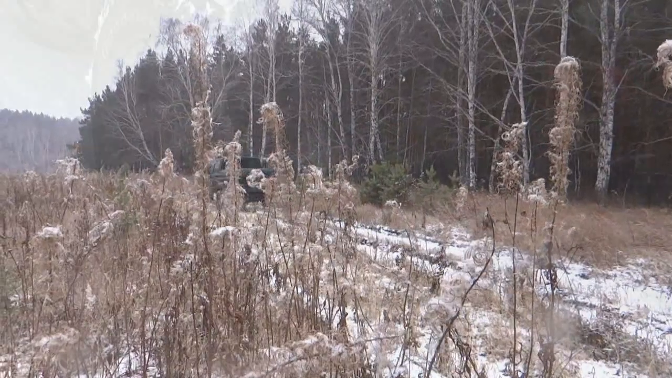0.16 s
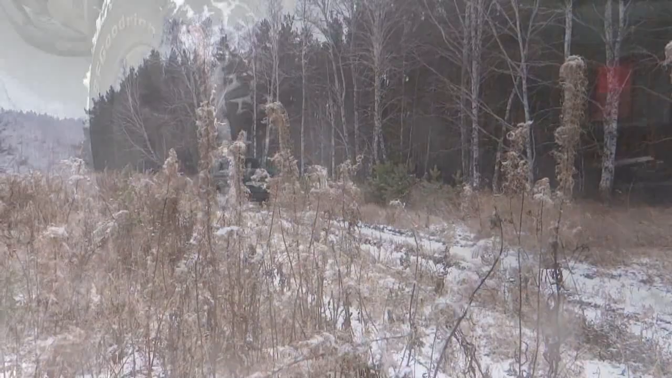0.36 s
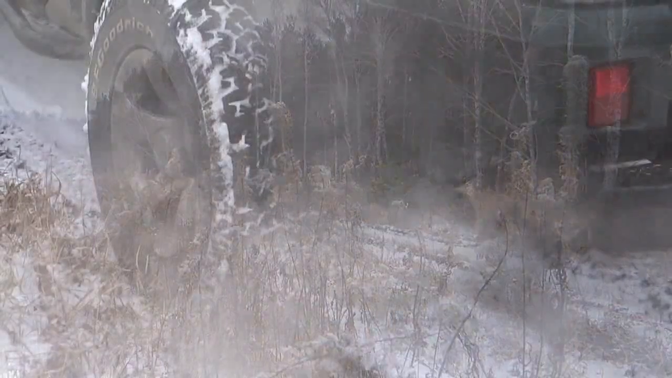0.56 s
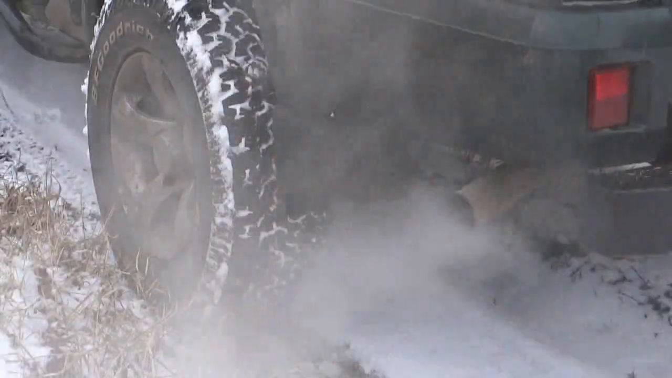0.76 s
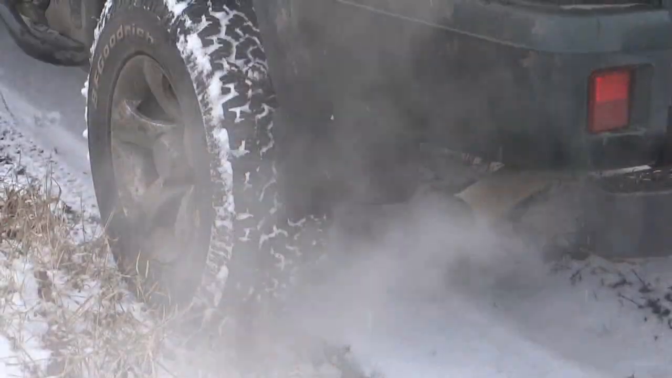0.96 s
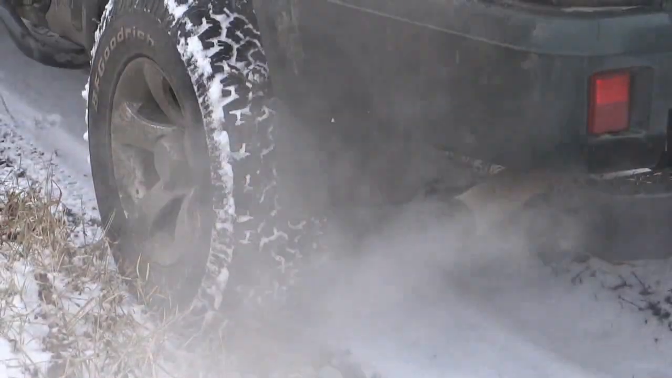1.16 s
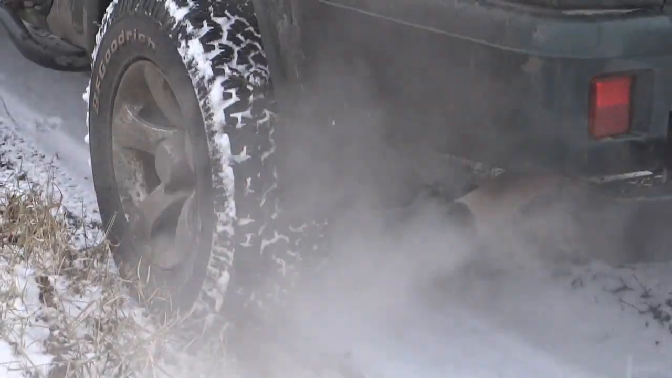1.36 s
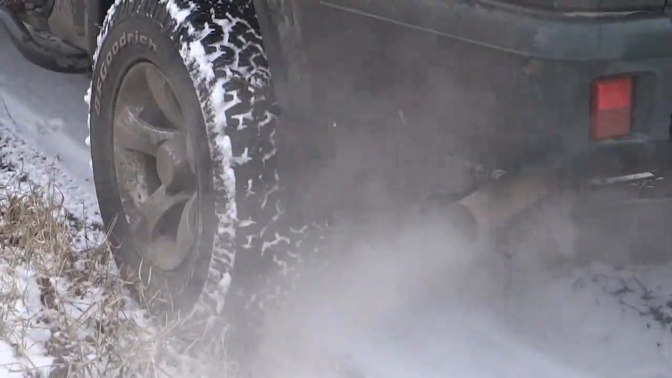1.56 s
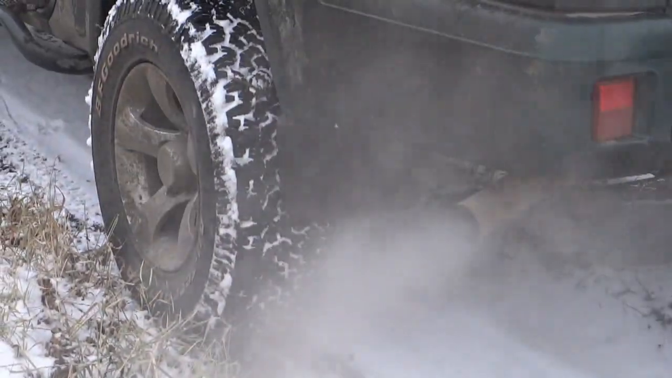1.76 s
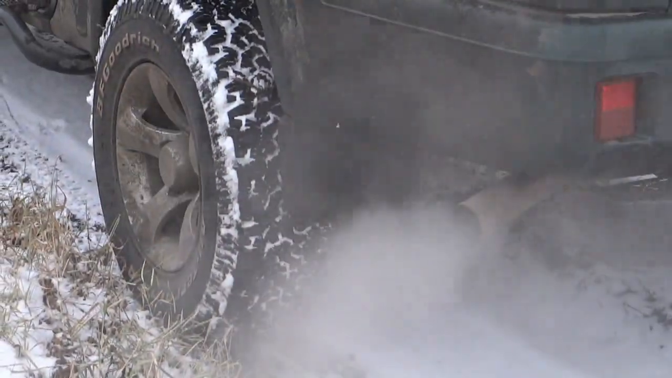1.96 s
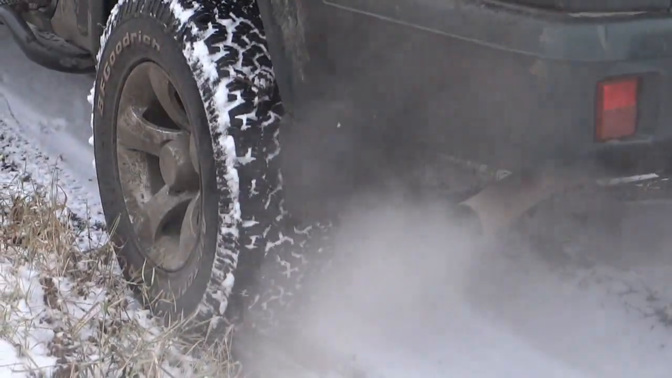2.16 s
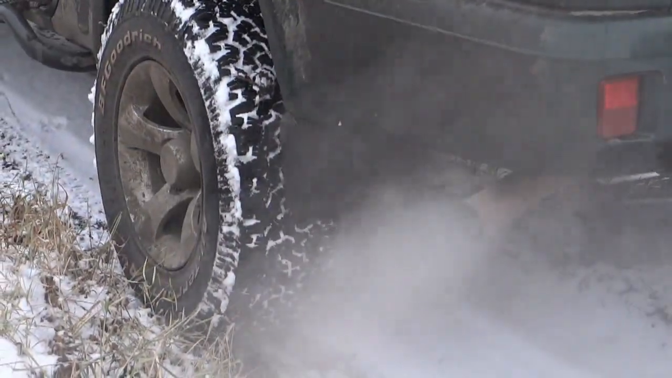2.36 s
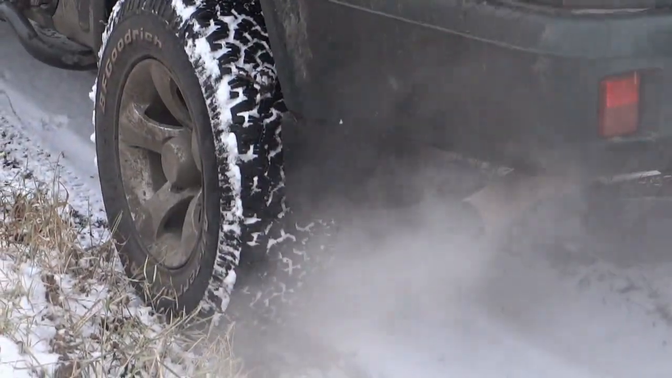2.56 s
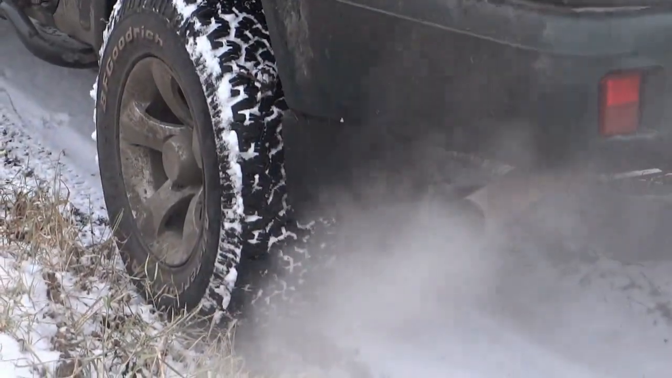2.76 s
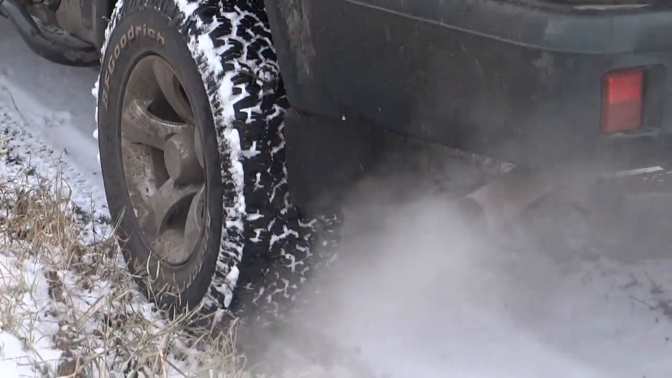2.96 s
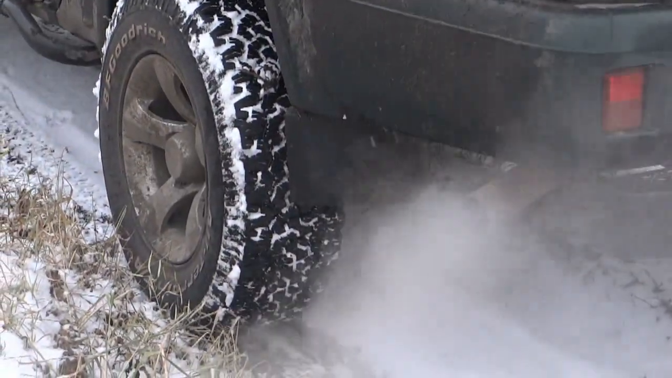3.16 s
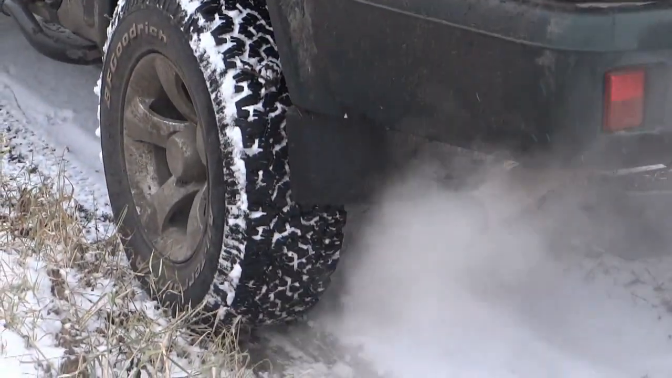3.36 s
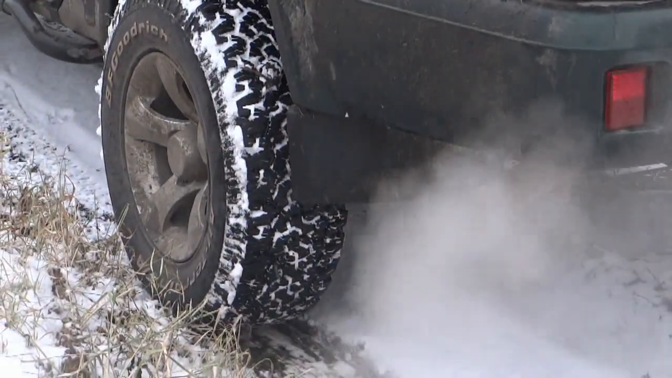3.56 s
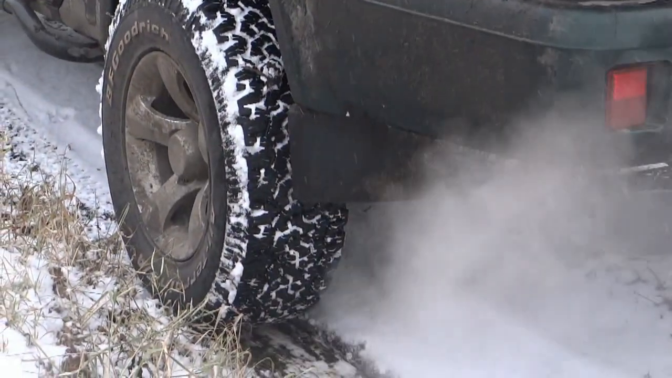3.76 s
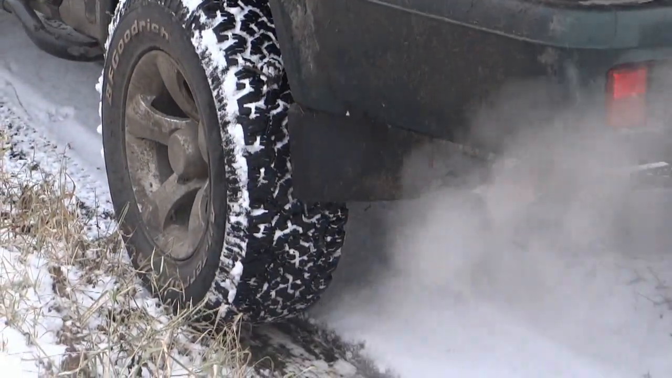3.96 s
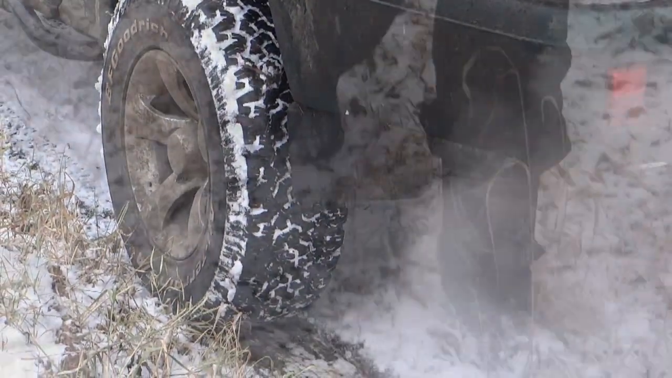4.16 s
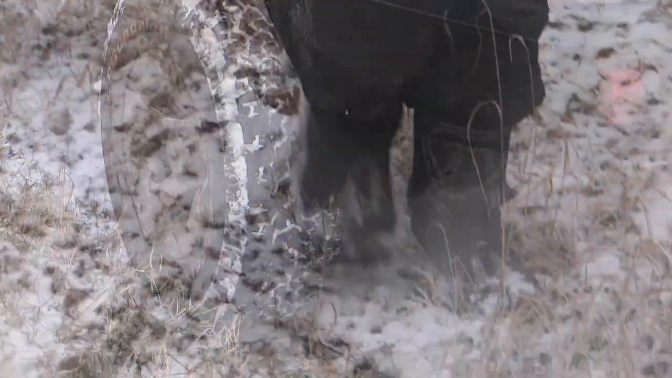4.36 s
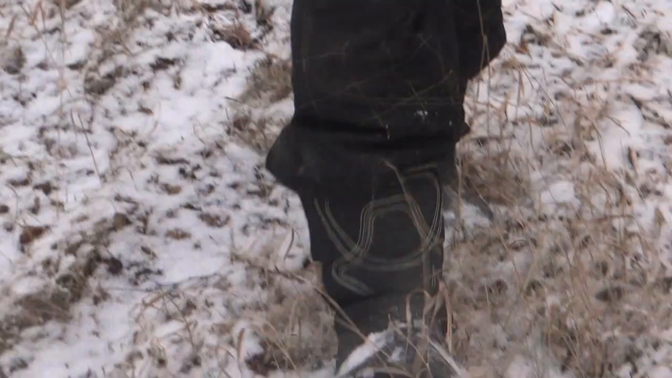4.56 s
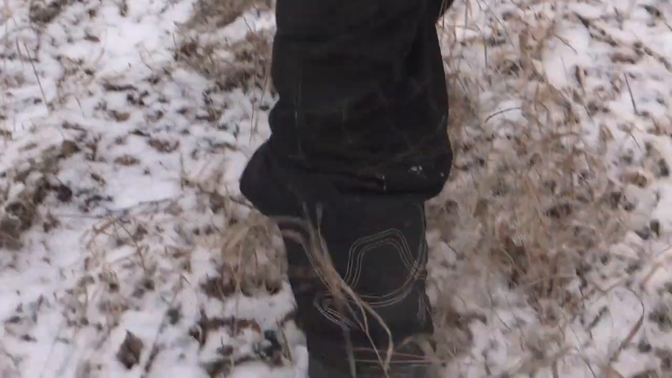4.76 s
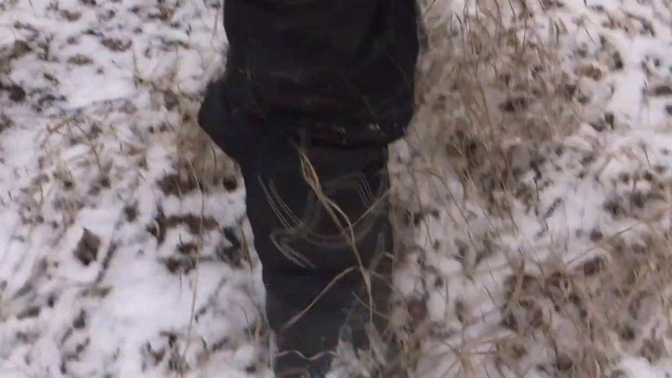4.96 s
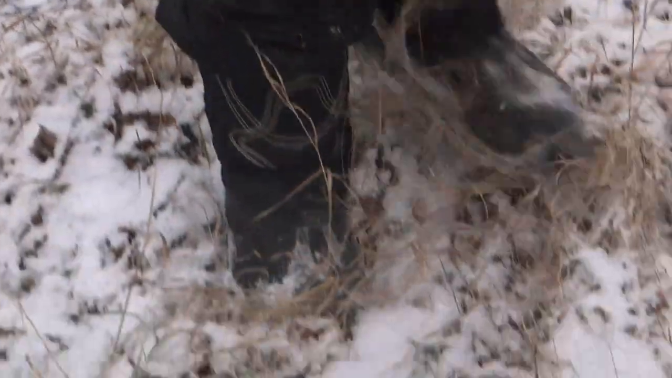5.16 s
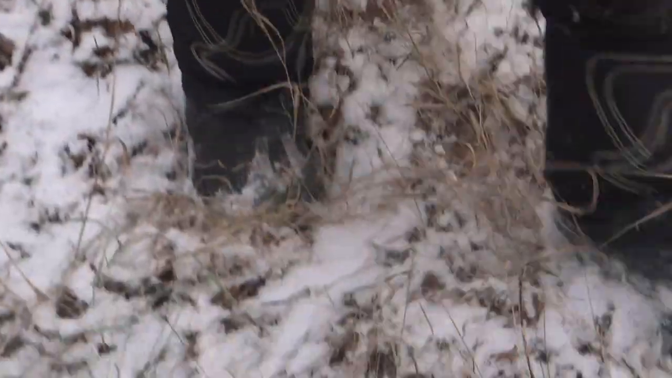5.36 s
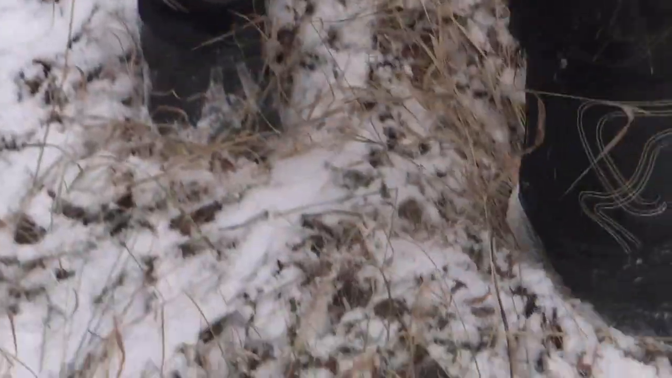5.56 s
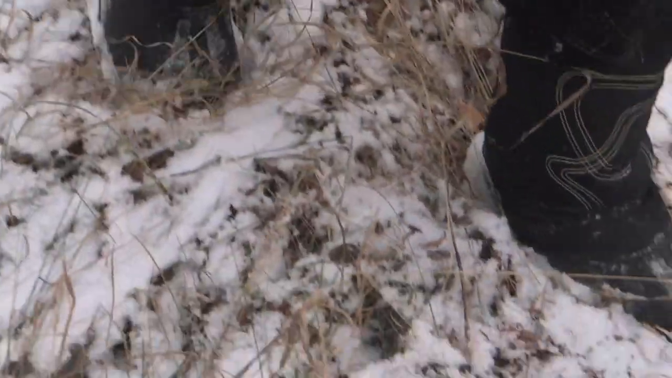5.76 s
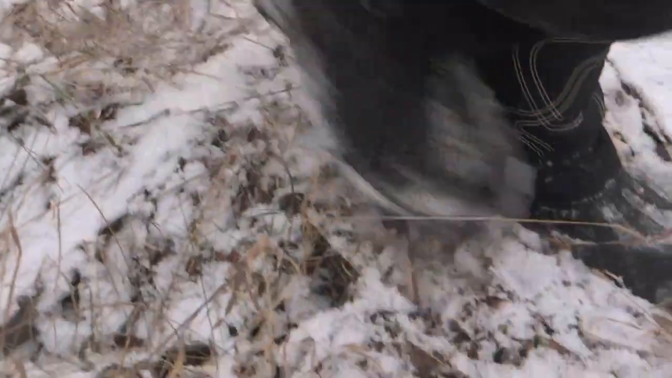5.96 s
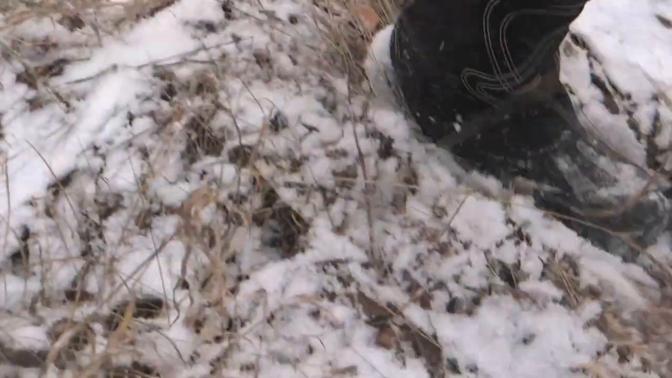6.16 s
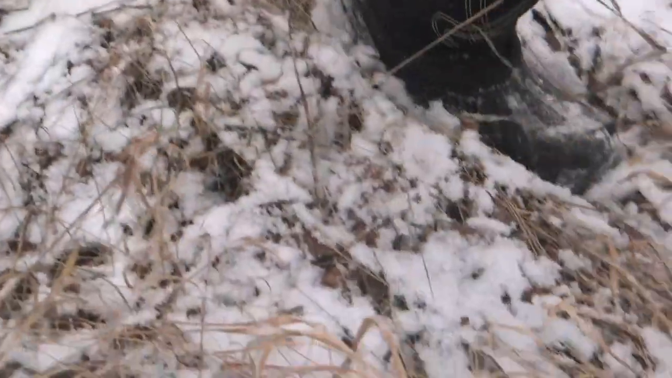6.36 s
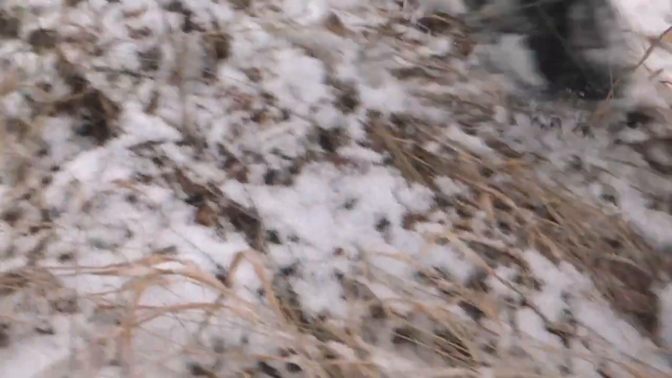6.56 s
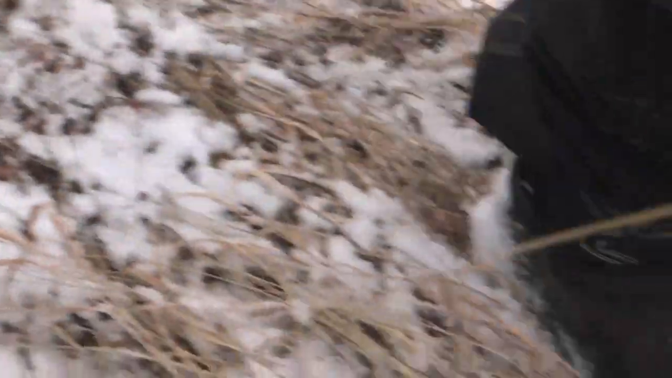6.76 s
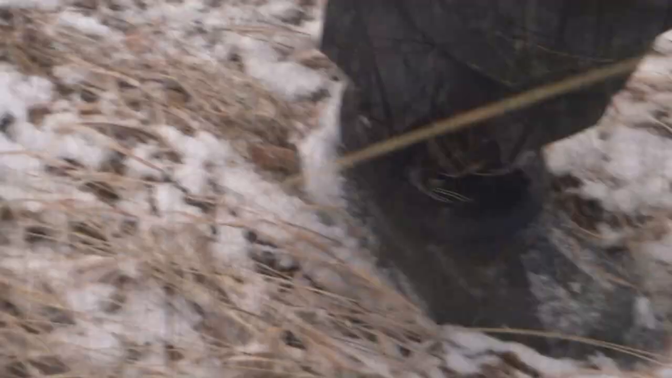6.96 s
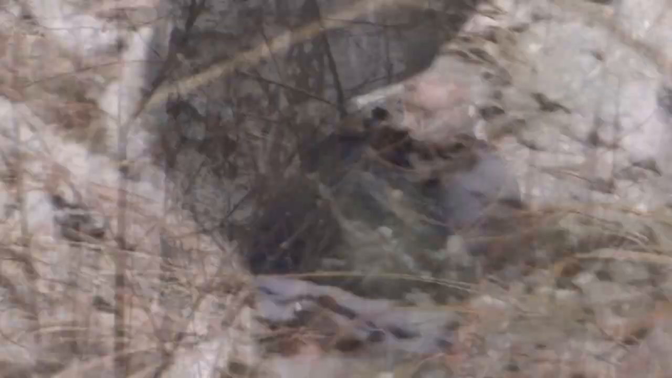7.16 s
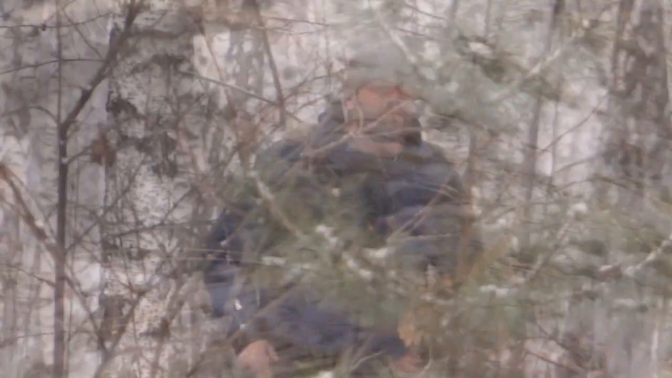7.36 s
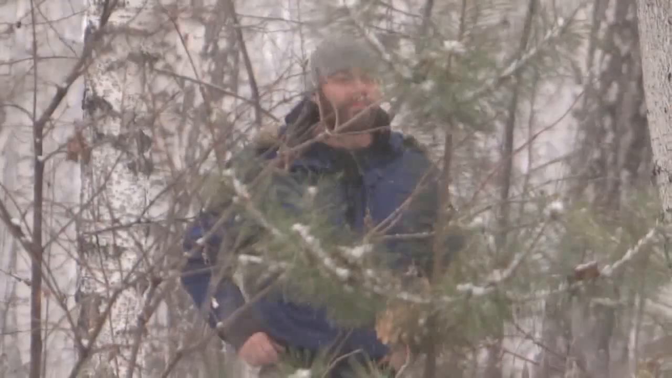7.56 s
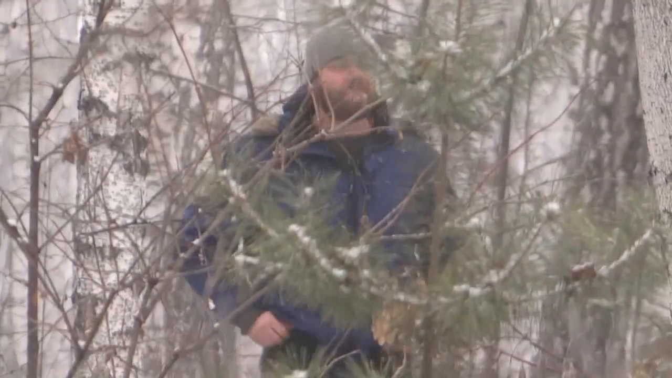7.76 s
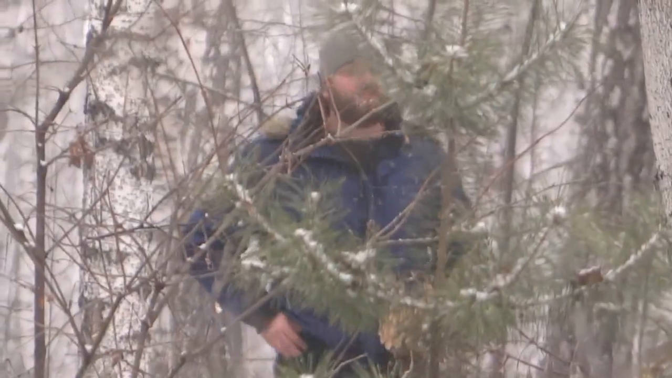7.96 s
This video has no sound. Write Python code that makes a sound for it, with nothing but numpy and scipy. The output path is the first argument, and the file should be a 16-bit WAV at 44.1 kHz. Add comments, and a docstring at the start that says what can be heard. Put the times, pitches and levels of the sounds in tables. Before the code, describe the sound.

An off-road vehicle idles, far then close at its tailpipe, fades out, and boots crunch through thin snow and dry grass, stalks snapping.

```python
"""A snowy field: a four-cylinder off-roader idles, first far away, then right at its tailpipe.
The idle (hum of crank multiples, chopped gas noise in a ringing pipe, brief chatter) fades out.
Boots wade through thin snow and dry grass: noise grains swish, falling tones pop, damped rings snap.
A dull, distant rumble of filtered noise, a faint whistling bird and a soft scrape are left at the end."""
import sys
import numpy as np
from scipy import signal
from scipy.fft import rfft, irfft
from scipy.io import wavfile

SR = 44100
rng = np.random.default_rng(int(sys.argv[2]) if len(sys.argv) > 2 else 0)


def waveform_to_disk(signal):
    """Save audio, clipped to [-1, 1], as 16-bit WAV at the path in sys.argv[1]."""
    frames = np.transpose(np.atleast_2d(signal))
    scaled = np.clip(frames, -1, 1) * 32767
    samples = np.round(scaled).astype(np.int16)
    wavfile.write(sys.argv[1], SR, samples)


N = 356857
TIME = np.arange(N) / SR
BINS = np.fft.rfftfreq(N, 1 / SR)


def amp(db):
    """Decibels to gain."""
    return 10 ** (np.asarray(db) / 20)


def unit(x):
    """Scales to rms 1."""
    return x / np.sqrt(np.mean(x ** 2) + 1e-20)


def curve(rows):
    """A time table, interpolated at every sample."""
    return np.interp(TIME, *np.transpose(rows))


def ramp(span_s):
    """Rises from 0 to 1 between two times."""
    return np.interp(TIME, span_s, [0, 1])


def colour(x, spectrum, rings=()):
    """Filters by a smooth spectrum with resonances or hollows on it; rms 1."""
    hz, db = np.transpose(spectrum)
    shape_db = np.interp(np.log(BINS + 1), np.log(hz), db)
    for centre_hz, width_hz, lift_db in rings:
        shape_db = shape_db + lift_db / (1 + (2 * (BINS - centre_hz) / width_hz) ** 2)
    return unit(irfft(rfft(x) * amp(shape_db), N))


def wander(rate_hz):
    """Random drift of rms 1, with a Gaussian roll-off at about rate_hz."""
    noise = rng.standard_normal(N)
    return unit(irfft(rfft(noise) * np.exp(-(BINS / rate_hz) ** 2), N))


def spread(mid, side, width):
    """Left and right from a shared part and an opposed part."""
    return np.array([mid + width * side, mid - width * side])


def hiss(width):
    """White noise, partly alike in both ears."""
    return spread(*rng.standard_normal((2, N)), width)


def grains(per_s, size_db, width):
    """Single-sample clicks at random moments and places, of random size; rms 1."""
    size = amp(size_db * np.minimum(rng.exponential(1, N), 4))
    present = rng.random(N) < per_s / SR
    clicks = size * rng.choice([-1, 1], N) * present
    return unit(spread(clicks, clicks * rng.standard_normal(N), width))


def add(mix, s, sound):
    """Mixes a sound in at time s."""
    part = mix[round(s * SR):][:len(sound)]
    part += sound[:len(part)]


# open-air spectrum: f/Hz, relative level/dB per Hz
AIR_SPECTRUM = [(24, -34), (40, -13), (79, -18), (172, 1), (228, -14), (556, -35), (829, -9.5), (1530, -38),
                (1890, -11), (2440, -17), (3640, -21.5), (4100, -23), (5310, -24), (7210, -21.5),
                (11000, -40), (14300, -80), (22000, -120)]
# its course: t/s, level/dB
AIR_LEVEL = [(0, -59), (.3, -60), (.7, -72), (4.5, -81), (7.4, -84), (8.09, -72)]


def open_air(throb_db=3.0):
    """Faint wash of open air with a low murmur: coloured noise, throbbing at random."""
    wash = colour(hiss(0.29), AIR_SPECTRUM, rings=[(165, 50, 3.3), (3700, 250, 6)])
    return wash * amp(curve(AIR_LEVEL) + throb_db * wander(18))


# distant rumble spectrum: f/Hz, relative level/dB per Hz
RUMBLE_SPECTRUM = [(35, -62), (60, -20), (150, -12), (237, 8), (336, 9.5), (520, 0), (1020, 0),
                   (1220, -6.5), (1480, -8), (1580, -10.5), (2050, -10.5), (2440, -18), (5840, -19.5),
                   (6660, -16.5), (11000, -16.5), (14300, -58), (22000, -120)]
# its course: t/s, level/dB
RUMBLE_LEVEL = [(6.9, -70), (7.3, -57), (7.62, -51.5), (7.84, -49.5), (7.97, -49), (8.09, -48.5)]


def distant_rumble(throb_db=0.85):
    """Dull rumble among the trees: coloured noise with a thin ring in its hiss."""
    noise = colour(hiss(0.69), RUMBLE_SPECTRUM, rings=[(9650, 180, 6.9)])
    return noise * amp(curve(RUMBLE_LEVEL) + throb_db * wander(40))


def twig(s=8.025, half_width_s=0.022, level_db=-61):
    """Soft scrape of a branch: coloured noise under a brief bell-shaped swell."""
    spectrum = [(1000, -25), (2400, -3), (3100, 0), (4300, -11), (8500, -15), (11000, -25)]
    swell = np.exp(-((TIME - s) / half_width_s) ** 2)
    return amp(level_db) * swell * colour(hiss(.3), spectrum)


# bird notes: t/s, length/s, start f/Hz, end f/Hz, peak level/dB
WHISTLES = [(7.63, 0.084, 6900, 6720, -65), (7.71, .05, 6620, 6500, -68), (7.825, 0.098, 6950, 6720, -69),
            (7.91, .05, 6650, 6520, -71)]


def birds(quaver=0.0032):
    """Small far bird: thin sine whistles, slightly falling, with unsteady pitch."""
    out, unsteady = np.zeros(N), 1 + quaver * wander(150)
    for s, length_s, start_hz, end_hz, db in WHISTLES:
        count = round(length_s * SR)
        quiver = unsteady[round(s * SR) - count:][:count]
        pitch_hz = np.linspace(start_hz, end_hz, count) * quiver
        whistle = np.sin(2 * np.pi * np.cumsum(pitch_hz) / SR)
        add(out, s, amp(db) * signal.windows.tukey(count, .5) * whistle)
    return out


WALK_IN_S, WALK_OUT_S = (4.5, 4.58), (7.59, 7.65)


def strokes(rows, attack_s, release_s, stir_db):
    """Strength of a run of movements over a steady stir: each builds up, holds and dies away."""
    power = (amp(stir_db) * ramp(WALK_IN_S)) ** 2
    for s, length_s, db in rows:
        release = np.exp(-np.maximum(TIME - s - length_s, 0) / release_s)
        power = power + (amp(db) * ramp([s, s + attack_s]) * release) ** 2
    return np.sqrt(power) * (1 - ramp(WALK_OUT_S))


# weight pressing into the snow: t/s, length/s, relative level/dB
TREADS = [(4.3, 0.2, -62), (4.72, 0.077, -50), (4.87, 0.16, -49), (5.13, 0.28, -52), (5.34, .43, -47),
          (5.86, 0.073, -53), (6.035, 0.021, -47), (6.18, 0.2, -45.5), (6.43, .18, -47), (6.71, .12, -47.5),
          (6.83, 0.36, -40.5), (7.22, 0.093, -48), (7.335, 0.059, -42.5), (7.45, 0.037, -47)]
# crushed snow spectrum: f/Hz, relative level/dB per Hz
SNOW_SPECTRUM = [(40, -24), (100, -22.5), (200, -3), (300, 1), (650, 1), (950, 2), (1250, 0.5), (1800, 0.5),
                 (2400, 0.5), (3500, -1.5), (6000, -2), (11000, -10.5)]


def treading(snow_db=1, clump_db=2.07, crackle_db=-11):
    """Clumps of breaking snow grains; sparse thin stems give way under the same weight."""
    crush = strokes(TREADS, attack_s=0.017, release_s=0.04, stir_db=-55.5)
    snow_rings = [(616, 110, 2.5), (890, 190, -2), (2300, 350, 2.5)]
    snow = colour(grains(per_s=6000, size_db=3.0, width=0.33), SNOW_SPECTRUM, snow_rings)
    stem_spectrum = [(300, -39), (1500, -8), (3000, 12), (8000, 15), (11000, -24)]
    stems = colour(grains(per_s=330, size_db=6.0, width=0.36), stem_spectrum)
    return crush * (snow * amp(snow_db + clump_db * wander(55)) + stems * amp(crackle_db))


# a leg sweeping through grass: t/s, length/s, relative level/dB
SWISHES = [(4.31, 0.046, -56), (4.38, 0.03, -48.5), (4.54, 0.31, -48.5), (4.87, 0.31, -49.5),
           (5.11, 0.036, -35), (5.2, 0.13, -37.5), (5.31, .15, -36), (5.52, 0.1, -41), (5.85, 0.077, -39.5),
           (6.03, .04, -49), (6.175, 0.084, -34), (6.45, .1, -46.5), (6.575, 0.033, -36), (6.79, 0.13, -43),
           (6.925, 0.2, -35.5), (7.345, 0.16, -41), (7.55, 0.08, -47.5)]
# brushed grass spectrum: f/Hz, relative level/dB per Hz
GRASS_SPECTRUM = [(150, -47), (600, -40), (2000, -14), (4000, -9), (5700, -7.5), (6700, -3.5), (7900, 1),
                  (8900, 0.5), (10000, -3), (11000, -10)]


def brushing(grass_db=1, clump_db=1.14):
    """Fine fizz of grass sliding along the boots: dense, bright grains."""
    brush = strokes(SWISHES, attack_s=0.037, release_s=0.062, stir_db=-51.5)
    grass = colour(grains(per_s=22000, size_db=3.0, width=0.14), GRASS_SPECTRUM)
    return grass * brush * amp(grass_db + clump_db * wander(110))


# crust giving way under a sole:
# t/s, level/dB, start f/Hz, twice the decay constant/ms, relative thud level/dB
POPS = [(4.4859, -41.5, 1040, 2.6, -49), (4.662, -38, 1005, 3.2, -37.5), (4.8748, -29, 1580, 1.15, -28.5),
        (4.924, -34, 1700, 1.4, -55), (5.11, -39.5, 1900, 3.6, -34.5), (5.2381, -25.5, 1560, 1.07, -41),
        (5.4023, -34, 1050, 1, -36), (5.644, -35, 1170, 2.8, -40), (5.7699, -27.5, 1830, 0.64, -48),
        (6.0094, -50, 700, 3, -41.5), (6.0715, -32.5, 1510, 0.73, -62), (6.0837, -40, 1100, 2.5, -51),
        (6.1597, -38.5, 1390, 1.7, -57), (6.2577, -28.5, 1410, 0.64, -62), (6.4225, -32, 1900, 1.1, -35.5),
        (6.48, -24.5, 1480, 1.5, -33), (6.5155, -36, 1770, 3.6, -38), (6.6723, -34, 955, 2.5, -31),
        (6.7131, -31, 1900, 1.5, -50), (6.773, -39.5, 700, 0.77, -39), (6.8972, -20.5, 1790, 1.17, -24),
        (7.0248, -28, 1520, 0.4, -35), (7.1532, -37, 1070, 1.2, -32.5), (7.3507, -32, 960, 2.6, -34)]


def crust(fall_s=0.00221, end_hz=260, grit=0.59, thud_hz=400, thud_fall_s=0.011, thud_s=0.0011):
    """Each collapse is a gritty tone falling in pitch, then a dull thud as the sole settles."""
    out, t = np.zeros(N), np.arange(SR // 30) / SR
    thud_phase = 2 * np.pi * np.cumsum(thud_hz * np.exp(-t / thud_fall_s)) / SR
    thud = t / thud_s * np.exp(1 - t / thud_s) * np.sin(thud_phase)
    for s, db, hz, decay_ms, thud_db in POPS:
        pitch_hz = end_hz + (hz - end_hz) * np.exp(-t / fall_s)
        age = 2 * t / (decay_ms / 1000)
        tone = np.sin(2 * np.pi * np.cumsum(pitch_hz) / SR)
        crack = age * np.exp(1 - age) * (tone + grit * rng.standard_normal(len(t)))
        add(out, s, amp(db) * crack)
        add(out, s + 0.0017, amp(thud_db - 3.5) * thud)
    return signal.sosfilt(signal.butter(2, 130, "high", fs=SR, output="sos"), out)


# dry stalks breaking: t/s, level/dB, ring f/Hz
SNAPS = [(4.779, -29, 5000), (4.876, -29, 7000), (4.9327, -26.5, 4930), (5.479, -31, 7500),
         (5.5836, -25, 5750), (5.643, -22.5, 2350), (5.7577, -23, 5600), (6.0775, -24.5, 7000),
         (6.259, -25, 2620), (6.5183, -27.5, 2173), (6.8333, -24, 7000), (6.8727, -30, 3000),
         (6.8951, -18.5, 2680), (6.9, -17.5, 5200), (6.903, -18, 5230), (6.9058, -17.5, 2730),
         (6.918, -23, 2300), (7.152, -15, 2200), (7.2304, -15, 2950), (7.244, -26, 4220)]


def stalks(ring_s=0.00035, splinter=0.22, splinter_s=0.0012, overtone=1.58, overtone_db=-6):
    """A break is a sharp, heavily damped ring with one overtone, and a short spray of splinters."""
    out, t = np.zeros(N), np.arange(SR // 80) / SR
    for s, db, hz in SNAPS:
        phase = 2 * np.pi * hz * t
        tones = np.cos(phase) + amp(overtone_db) * np.sin(overtone * phase)
        ring = tones * np.exp(-t / ring_s)
        spray = splinter * rng.standard_normal(len(t)) * np.exp(-t / splinter_s)
        add(out, s, amp(db) * (ring + spray))
    return signal.sosfilt(signal.butter(1, 900, "high", fs=SR, output="sos"), out)


# position of the boots: t/s, left minus right level/dB
BOOTS_PAN = [(4.5, -0.5), (5.7, -1), (6.25, -2.5), (7.3, -4)]


def boots():
    """All sounds of the walk, drifting to the right by level difference."""
    pan_db = curve(BOOTS_PAN)
    walk = treading() + brushing() + crust() + stalks()
    return walk * amp(np.array([pan_db, -pan_db]) / 2)


# exhaust chatter: t/s, relative level/dB
RATTLES = [(2.54, -44.5), (2.862, -48), (2.972, -46), (3.259, -44), (3.4, -44), (3.844, -41.5)]


def rattle(level_db=-6, rise_s=0.0052):
    """Now and then the shaking exhaust chatters: metallic grains in brief bursts."""
    shake, age = np.zeros(N), np.arange(SR // 15) / SR / rise_s
    for s, db in RATTLES:
        add(shake, s, amp(db + level_db) * age * np.exp(1 - age))
    metal = [(500, -41), (950, -13), (1170, 9), (1450, -19), (2300, -8), (3500, -18), (9000, -42)]
    return shake * colour(grains(per_s=1600, size_db=-2.0, width=.1), metal)


def idle_level(near_s=(0.29, 0.81), gone_s=(4.09, 4.65), far_db=-12.5, swell_db_per_s=0.74, middle_s=1.57):
    """Gain of the engine: faint from afar, then close and swelling, then fading away."""
    far = amp(far_db)
    close = amp(swell_db_per_s * (TIME - middle_s))
    return (far + (close - far) * ramp(near_s)) * (1 - ramp(gone_s))


# crankshaft speed: t/s, turns per second/Hz
CRANK = [(0, 27.4), (.2, 27.1), (.5, 27.7), (1, 27.8), (1.3, 27.55), (2.3, 27.8), (4.6, 27.75)]
# exhaust hum: multiple of crank speed, relative level/dB
ORDERS_DB = [(1, -22), (2, 1), (3, -10.5), (3.5, -15), (4, -1.5), (5, -17.5), (7, -13.5), (8.5, -18),
             (9, -11), (9.5, -7.5), (10, -8), (11.5, -8), (12, -12.5), (13, -17.5), (15, -10.5)]
# extra lift of the fourth multiple: t/s, lift/dB
BOOM = [(.9, -3.5), (1.45, 2.5), (2.0, -0.5), (2.63, -4), (3.3, -1), (3.61, -4), (4.04, 2.5), (4.4, -2.5)]


def exhaust_hum(angle, waver=.04):
    """Sum of crank multiples; unevenness grows with the multiple."""
    hum = np.zeros(N)
    for multiple, db in ORDERS_DB:
        k = round(2 * multiple) / 2  # the cycle takes two turns
        # firing orders strike together, the rest come from uneven cylinders
        phase = k * angle + (2 * np.pi * rng.random() if k % 2 else 0)
        boom_db = curve(BOOM) if k == 4 else 0
        shaky = waver * k * wander(7.6) * np.cos(phase + 2 * np.pi * rng.random())
        hum += amp(db + boom_db) * (np.cos(phase) + shaky)
    return hum


# gas rush and machine noise: f/Hz, relative level/dB per Hz
RUSH_SPECTRUM = [(25, -39), (60, -24), (150, -7), (270, -7.5), (400, -4.5), (540, -12.5), (800, -16.5),
                 (1100, -11), (1900, -15), (2400, -10.5), (3400, -17.5), (5300, -15.5), (6100, -17.5),
                 (8500, -17.5), (11000, -32)]
# rings and hollows of pipe and engine block: f/Hz, width/Hz, lift/dB
PIPE = [(669, 82, 6.5), (938, 28, 7), (1115, 21, 8), (1223, 90, 8.5), (1558, 38, 7.5), (1689, 26, 11),
        (1900, 150, -2.5), (2255, 87, 5), (2915, 44, 10.5), (3673, 106, 6.5), (4600, 36, 9.5),
        (5140, 180, 1.5), (5126, 154, 10.5), (6150, 180, -8), (7000, 150, -5.5), (7230, 160, 6.5),
        (7480, 180, -14), (7700, 140, 8.5)]


def gas_rush(angle, puff=.25, limp=0.019, knock=.13, tick=0.011, belt_hz=37.5, lean_db=.5):
    """Grain noise through the ringing pipe, chopped by two firings a turn."""
    # one cylinder is stronger than the others
    flow = 1 + puff * np.cos(2 * angle) + limp * (np.cos(angle / 2) + np.cos(angle + angle / 2))
    # a belt-driven part flutters at its own rate
    flutter = 1 + tick * (np.cos(2 * np.pi * belt_hz * TIME) + np.cos(angle))
    knocking = knock * (np.cos(angle) + np.cos(3 * angle) / 2)  # repeats once a turn
    gas = colour(grains(per_s=9000, size_db=0.93, width=0.25), RUSH_SPECTRUM, PIPE)
    low = signal.sosfiltfilt(signal.butter(2, 1400, fs=SR, output="sos"), gas)
    clatter_band = signal.butter(2, [900, 3200], "band", fs=SR, output="sos")
    clatter = signal.sosfiltfilt(clatter_band, gas)
    rush = low * flow + clatter * knocking + (gas - low) * flutter
    return rush * amp(0.51 * wander(53)) * amp([[lean_db], [-lean_db]])  # left up, right down


def engine(hum_db=-54.0, rush_db=-52):
    """One slightly unsteady crank angle drives both the hum and the gas rush."""
    jitter_turns = 0.0018 * wander(3.9)
    angle = 2 * np.pi * (np.cumsum(curve(CRANK)) / SR + jitter_turns)
    return idle_level() * (amp(hum_db) * exhaust_hum(angle) + amp(rush_db) * gas_rush(angle))


def scene():
    """Engine ahead, boots drifting to the right, open air all round."""
    background = open_air() + distant_rumble() + twig() + birds()
    return background + boots() + rattle() + engine()


def record(dry, mono_below_hz=470, edge_hz=11150):
    """Close-set microphones hear the bass nearly alike; then a steep low-pass."""
    apart = 0.13 + 0.66 * BINS ** 3 / np.hypot(BINS ** 3, mono_below_hz ** 3)
    side = irfft(rfft(dry[0] - dry[1]) / 2 * apart, N)
    pair = spread(dry.mean(0), side, 0.95)
    low_pass = signal.firwin(801, edge_hz, window=("kaiser", 9), fs=SR)
    return signal.oaconvolve(pair, low_pass[None], "same")


dry = scene()
out = record(dry)
waveform_to_disk(out)
```